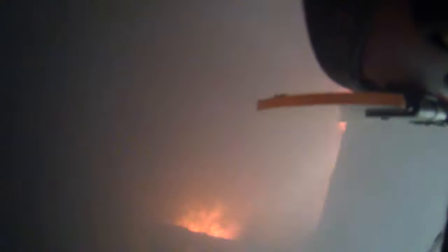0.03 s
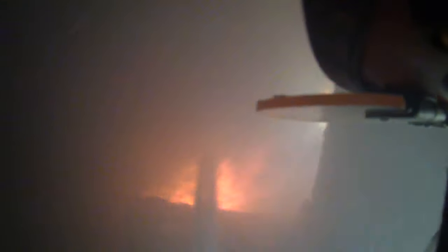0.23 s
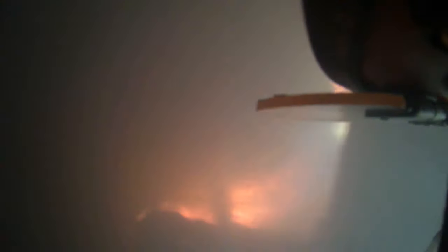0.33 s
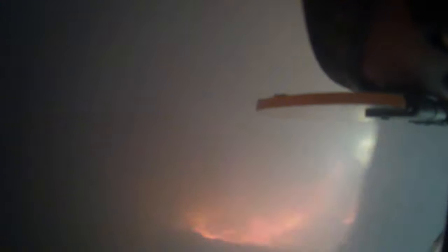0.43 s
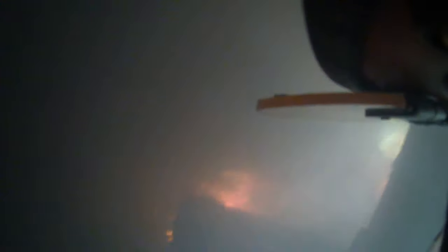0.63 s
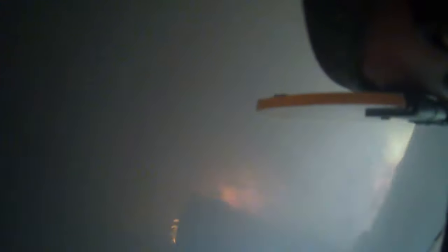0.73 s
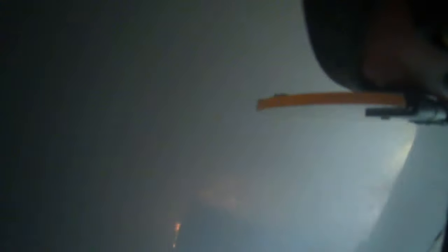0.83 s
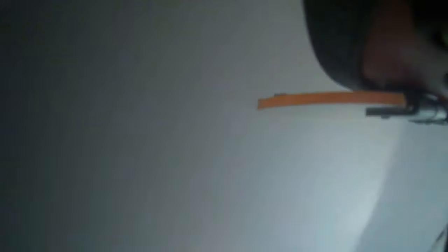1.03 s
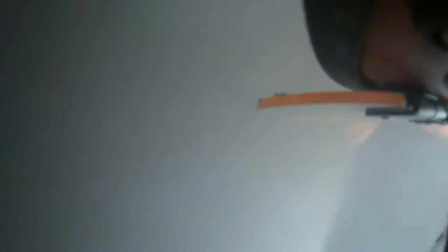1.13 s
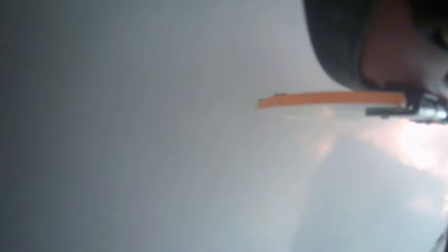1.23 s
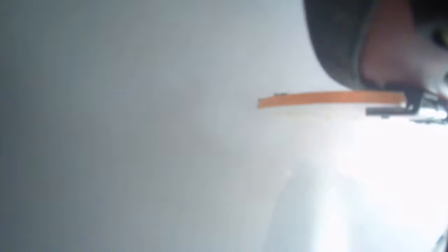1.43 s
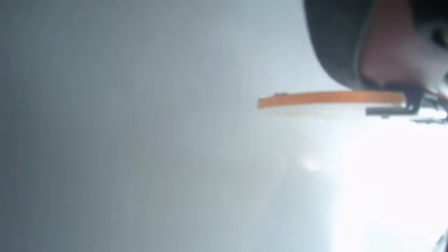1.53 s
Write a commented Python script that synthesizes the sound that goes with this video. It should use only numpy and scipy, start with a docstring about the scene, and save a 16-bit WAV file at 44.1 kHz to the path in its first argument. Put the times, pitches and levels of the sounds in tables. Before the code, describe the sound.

A fire roars and rumbles inside a burning building, muffled through a helmet microphone. Early on, one loud knock hits the casing and briefly rattles. The roar flutters on with faint water spray hiss and a machine hum.

```python
"""A burning building roars and rumbles, heard through a helmet camera's closed housing. The roar flutters.
Droplets of water spray hiss and a machine hums, its narrow whine swelling for a moment. Something knocks once
against the housing and chatters briefly, making it ring and crack. The camera turns itself down on the loud
knock, then recovers."""
import sys
import numpy as np
from scipy import signal
from scipy.fft import rfft, irfft, next_fast_len
from scipy.io import wavfile
from scipy.ndimage import uniform_filter1d, map_coordinates

SR = 44100
rng = np.random.default_rng(int(sys.argv[2]) if len(sys.argv) > 2 else 0)


def master(y):
    """Save y as 16-bit WAV."""
    cut = np.clip(np.atleast_2d(y).T, -1, 1)
    pcm = np.round(cut * 32767)  # scale
    wavfile.write(sys.argv[1], SR, pcm.astype(np.int16))


N = 70560  # 1.6 seconds


def amp(db):
    """Turn decibels (dB) into a number to multiply a sound by."""
    return 10 ** (np.asarray(db) / 20)


def unit(x):
    """Scale a sound so that its average power is 1."""
    return x / np.sqrt(np.mean(x ** 2) + 1e-20)


def curve(rows):
    """Join (seconds, value) points with straight lines, one value per sample."""
    return np.interp(np.arange(N) / SR, *np.transpose(rows))


def wobble(per_second):
    """A smooth curve through this many random values a second."""
    return map_coordinates(rng.standard_normal(2 ** 12), [np.arange(N) * per_second / SR], mode="mirror")


def filtered(x, gain_at):
    """Multiply each frequency in a sound by gain_at(frequency)."""
    size = next_fast_len(N + SR // 2)
    hz = np.fft.rfftfreq(size, 1 / SR)
    return irfft(rfft(x, size) * gain_at(hz), size)[:N]


def noise(colour):
    """Noise of power 1; its colour says how strong each frequency is next to the others."""
    row_hz, db = np.transpose(colour)
    white = rng.standard_normal(N)
    return unit(filtered(white, lambda hz: amp(np.interp(np.log(hz + 1), np.log(row_hz + 1), db))))


# How loud the roar, its hollow middle, the whine and the rumble are. Each row: time in seconds, level in dB.
ROAR_LOUDNESS = [(0, -41.5), (.15, -38), (.33, -47), (.4, -34), (.5, -40), (.72, -33), (.82, -39),
                 (.93, -37), (1.1, -37.5), (1.6, -39)]
HOLLOW_LOUDNESS = [(0, -34.5), (.18, -43.5), (.3, -30), (.37, -42), (.46, -34), (.61, -41), (.67, -30),
                   (.72, -32.5), (.83, -45), (.93, -35.5), (1.03, -42.5), (1.28, -40), (1.43, -36.5),
                   (1.48, -38.5), (1.6, -45)]
WHINE_LOUDNESS = [(0, -46.5), (.36, -45.5), (.44, -32.5), (.58, -38), (.67, -31.5), (.75, -48), (1.6, -45.5)]
RUMBLE_LOUDNESS = [(0, -43), (.4, -44), (.72, -39), (.85, -50.5), (1.3, -47), (1.6, -46.5)]
# The colours of those parts. Each row: frequency in Hz, relative strength in dB.
ROAR_COLOUR = [(60, -19), (105, -19), (128, -3.5), (150, -9), (180, 2.5), (235, -3.5), (270, -2.5),
               (320, -6), (450, -17), (900, -55.5)]
HOLLOW_COLOUR = [(180, -79), (280, -5.5), (335, -4.5), (385, -3.5), (430, -5.5), (470, -7), (520, -14.5),
                 (610, -16.5), (720, -25), (900, -38.5), (1500, -37), (3000, -93)]
WHINE_COLOUR = [(250, -56), (355, -22), (374, -0.5), (386, 1), (402, -2.5), (422, -18), (600, -71)]
RUMBLE_COLOUR = [(10, -7), (25, 0), (48, 2.5), (70, -8), (110, -2), (200, -38), (500, -68)]

def fire(flutter_db=1.5):
    """Deep rumble under a fluttering roar with a hollow middle; beside them a narrow whine near 390 Hz swells
    briefly."""
    flutter = amp(flutter_db * wobble(26.84))
    roar = amp(curve(ROAR_LOUDNESS)) * noise(ROAR_COLOUR)
    hollow = amp(curve(HOLLOW_LOUDNESS)) * noise(HOLLOW_COLOUR)
    whine = amp(curve(WHINE_LOUDNESS)) * noise(WHINE_COLOUR)
    rumble = amp(curve(RUMBLE_LOUDNESS)) * noise(RUMBLE_COLOUR)
    return flutter * (roar + hollow) + whine + rumble


# How loud the spray's hiss and fizz are. Each row: time in seconds, level in dB.
HISS_LOUDNESS = [(0, -43), (.17, -49), (.35, -49), (.47, -41.5), (.67, -42.5), (.82, -44.5), (.93, -43),
                 (1.13, -47.5), (1.24, -45.5), (1.38, -47), (1.5, -49.5), (1.6, -49)]
FIZZ_LOUDNESS = [(0, -52), (.17, -57), (.43, -55), (.6, -53), (.67, -50), (.73, -53.5), (.85, -54),
                 (.93, -53.5), (1.15, -58), (1.36, -56.5), (1.5, -59), (1.6, -58)]
# Their colours. Each row: frequency in Hz, relative strength in dB.
HISS_COLOUR = [(400, -6), (900, -23.5), (1200, -13.5), (1500, -10.5), (1800, -5), (2120, -1.5),
               (2500, -10.5), (2900, -15.5), (3450, -28.5), (5000, -48)]
FIZZ_COLOUR = [(2000, -42), (3450, -13.5), (4000, 0), (4500, 0), (5000, -3), (5500, -11), (5950, -16.5),
               (6500, -1.5), (7100, -0.5), (8000, -4.5), (8700, -2.5), (9600, -20), (10300, -11),
               (11100, -10.5), (12000, -31), (13200, -36), (14800, -34)]

def water_spray(surge_db=0.32, hiss_grain_db=1.14, fizz_grain_db=0.65):
    """Countless droplets make a grainy hiss, with a fine fizz above it."""
    hiss = unit(noise(HISS_COLOUR) * amp(hiss_grain_db * wobble(490)))
    fizz = unit(noise(FIZZ_COLOUR) * amp(-fizz_grain_db * wobble(700)))
    surge = amp(surge_db * wobble(34.6))
    return surge * (amp(curve(HISS_LOUDNESS)) * hiss + amp(curve(FIZZ_LOUDNESS)) * fizz)


def unsteady_tone(hz, db, pitch_drift=0.0065, waver_db=1.05):
    """A tone whose pitch and loudness wander a little."""
    pitch_hz = hz * (1 + pitch_drift * wobble(11.6))
    phase = 2 * np.pi * np.cumsum(pitch_hz) / SR
    return np.sqrt(2) * amp(db + waver_db * wobble(6.35)) * np.sin(phase)


# How the machine's drone swells and fades. Each row: time in seconds, level in dB.
DRONE_LOUDNESS = [(0, -40.5), (.6, -39), (.84, -45.5), (.92, -32.5), (1.03, -45.5), (1.13, -36.5),
                  (1.28, -43), (1.41, -40.5), (1.52, -50)]

def machine():
    """A steady hum and a swelling drone, perhaps from a pump."""
    hum = unsteady_tone(hz=63.4, db=-45.5)
    drone = unsteady_tone(hz=226.1, db=curve(DRONE_LOUDNESS))
    return hum + drone


# The knock and its chatter. Each row: start in seconds, thud level in dB, crack level in dB.
TAPS = [(0.2343, -6, -9.5), (0.2406, -18, -10.5), (0.2443, -44, -12.5), (0.245, -21.5, -16),
        (0.2544, -31.5, -21.5), (.274, -24, -45), (0.289, -26.5, -36)]
# The housing's notes. Each row: pitch in Hz, relative strength in dB, seconds to fade by 60 dB.
HOUSING_NOTES = [(115, -28, 0.017), (197.4, -0.5, 0.08), (270.6, 5, 0.053), (363.4, 4, 0.066),
                 (487.7, -9, 0.091), (535, -14, 0.057), (613, -52, 0.05)]
# The crack's colour. Each row: frequency in Hz, relative strength in dB.
CRACK_COLOUR = [(150, 3), (400, 7), (620, -4.5), (850, -6), (1300, -10.5), (1700, 7), (2150, 5),
                (2800, -7.5), (3400, -29.5), (4400, -15), (5800, -36), (7200, -23.5), (9500, -39),
                (11000, -36), (14000, -57)]

def knock(thud_rise_s=0.0019, crack_rise_s=0.00053, crack_fade_s=0.027, low_cut_hz=88):
    """Each tap rings the housing and adds a short crack; the small housing gives no deep bass."""
    taps = np.zeros(N)
    for start, thud_db, crack_db in TAPS:
        age = np.maximum(np.arange(N) / SR - start, 0)
        ring = sum(amp(db - 60 * age / fade_s) * np.sin(2 * np.pi * hz * age)
                   for hz, db, fade_s in HOUSING_NOTES)
        taps += amp(thud_db) * ring * (1 - np.exp(-age / thud_rise_s))
        crack = amp(crack_db - 60 * age / crack_fade_s) * noise(CRACK_COLOUR)
        taps += crack * (1 - np.exp(-age / crack_rise_s))
    bass_cut = signal.butter(2, low_cut_hz, "high", fs=SR, output="sos")
    return signal.sosfilt(bass_cut, taps)


def room_echo(x, fade_s=0.3, rise_s=0.005):
    """Sound bounces off the walls and blurs into a short tail."""
    t = np.arange(SR // 2) / SR
    tail = rng.standard_normal(len(t)) * amp(-60 * t / fade_s) * (1 - np.exp(-t / rise_s))
    return signal.fftconvolve(x, tail / np.linalg.norm(tail))[:N]


def scene(echo_db=-13):
    """Fire, spray and machine, with the close knock and its echo, in one channel."""
    hit = knock()
    return (fire() + water_spray() + machine() + hit + amp(echo_db) * room_echo(hit))[None]


def record(dry, loud_db=-7.5, turn_down_share=0.16, recover_db_per_s=11.5, ceiling_db=-3, top_hz=14700):
    """The camera turns loud sound down and recovers, rounds off peaks and cuts the highest treble."""
    x = dry[0]
    level_db = 10 * np.log10(np.abs(uniform_filter1d(x ** 2, size=256)) + 1e-12)
    too_loud_db = np.maximum(level_db - loud_db, 0)
    recovery_db = recover_db_per_s * np.arange(N) / SR
    # The volume drops at once, then creeps back up.
    drop_db = np.maximum.accumulate(turn_down_share * too_loud_db + recovery_db) - recovery_db
    x = x * amp(-drop_db)
    rounded = x / (1 + (x / amp(ceiling_db)) ** 4) ** (1 / 4)
    return filtered(rounded, lambda hz: hz < top_hz)[None]


dry = scene()
out = record(dry)
master(out)
```